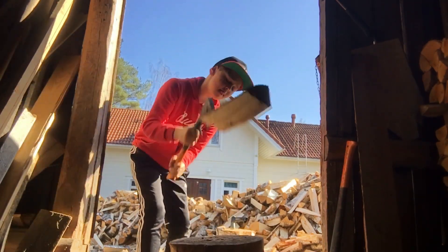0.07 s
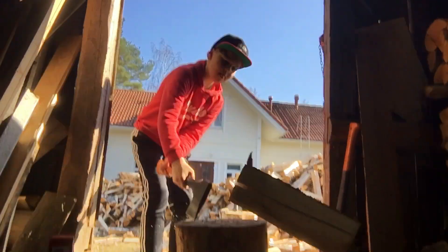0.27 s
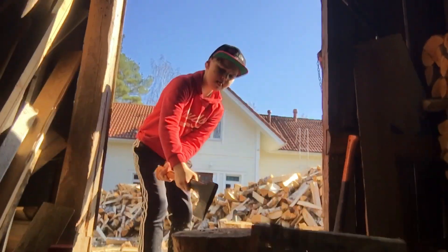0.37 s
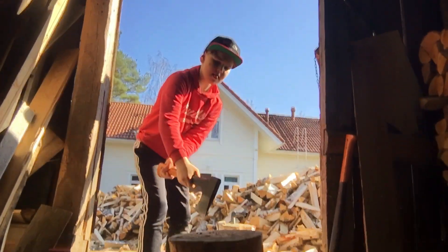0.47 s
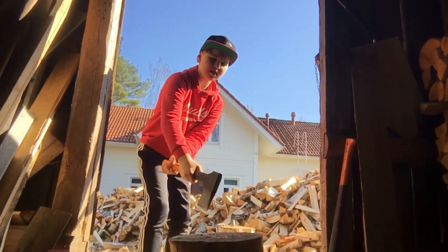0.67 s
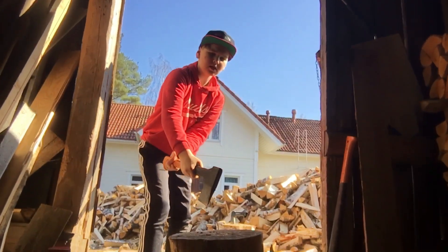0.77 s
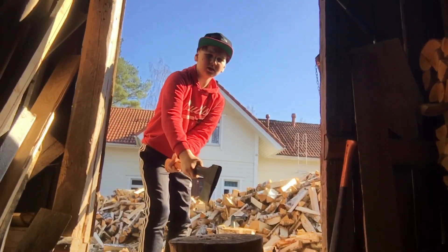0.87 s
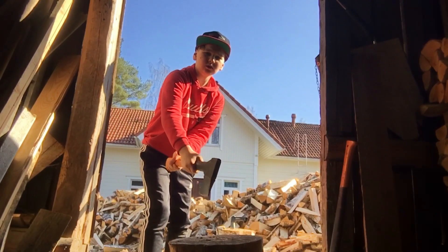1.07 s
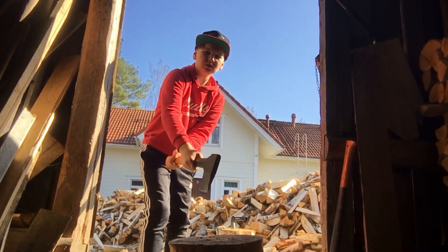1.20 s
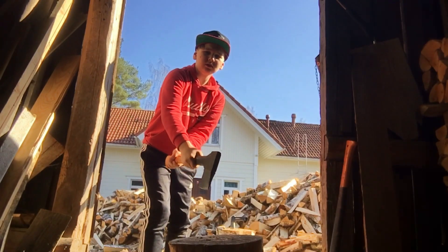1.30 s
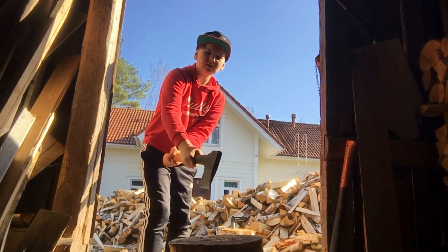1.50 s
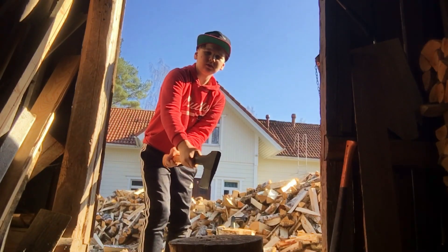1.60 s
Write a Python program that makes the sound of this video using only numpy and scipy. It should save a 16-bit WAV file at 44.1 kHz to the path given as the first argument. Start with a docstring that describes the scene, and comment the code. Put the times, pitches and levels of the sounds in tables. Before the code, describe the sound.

An axe splits a log, and one half clatters against boards onto a shed floor.

```python
"""A quiet yard in front of an open woodshed, one microphone close to the chopping block.
A foot shifts, an axe swishes, a log cracks open and the blade lands in the block. One half flies into
the shed, knocks against the boards, drops to the floor and rocks to rest; each knock is a dry clack
plus ringing wood modes. Splinters tick, a chip taps, the ground thuds and metal rings thinly.
The shed puts a short wooden reverberation behind the direct sound."""
import sys
import numpy as np
from scipy import signal
from scipy.fft import rfft, irfft, next_fast_len
from scipy.io import wavfile
from scipy.ndimage import uniform_filter1d

SR = 44100
rng = np.random.default_rng(int(sys.argv[2]) if len(sys.argv) > 2 else 0)


def transcribe(u):
    """Save the signal u as a 16-bit wav file named by the first command-line argument.

    u: samples, shape (n,) or (channels, n), limited to [-1, 1]; the rate is SR.
    q: integer samples, one column per channel.
    """
    v = np.clip(np.atleast_2d(u).T, -1, 1)
    q = np.round(v * 32767).astype(np.int16)
    wavfile.write(sys.argv[1], SR, q)


N = 72765
T = np.arange(N) / SR
HIT_T = T[:SR // 2]  # time within one hit

# Spectra and modes give relative levels; spectra are per Hz.
YARD_SPECTRUM = [(15, -28.5), (25, -4), (69, 0), (173, -10.5), (457, -14), (509, -16.5), (741, -16),
                 (1080, -19.5), (1950, -24), (5880, -32.5), (13200, -48), (15500, -52.5)]  # open air all round: f/Hz, level/dB
HISS_SPECTRUM = [(1000, 11), (3000, 1), (6000, -2.5), (9000, -13), (15500, -14)]  # faint hiss behind the clatter: f/Hz, level/dB
HISS_ENVELOPE = [(0.22, -80), (0.25, -58), (0.6, -54), (0.85, -58), (0.96, -60), (0.99, -67.5), (1.12, -67),
                 (1.2, -92)]  # its rise and fall: t/s, level/dB
SHED_SPECTRUM = [(60, -14.5), (200, -1.5), (400, 1), (1000, -1), (3000, 0), (7000, 1.5), (15000, -4)]  # colour of the reverberation: f/Hz, level/dB
SCUFF_SPECTRUM = [(80, -12), (230, 9.5), (320, -1), (500, -18), (2000, -54), (8000, -53)]  # foot on the ground: f/Hz, level/dB
LOW_THUDS = [(0.225, -12, 61), (0.238, -10.5, 105), (0.335, -14, 59.4), (0.47, -16.5, 171.9),
             (0.555, -33, 76), (0.815, -17.5, 62), (0.911, -18, 70), (1.006, -24, 66.7),
             (1.070, -27, 78), (1.139, -23.5, 80)]  # dull low thuds, mostly underfoot; the one near 0.24 s is the blade landing in the block: t/s, level/dB, f/Hz
METAL_RINGS = [(0.551, 6150, -22.5, 0.23), (0.552, 4930, -22.5, 0.24), (0.616, 4560, -24, 0.076),
               (0.621, 4780, -24, 0.1)]  # metal in the shed: t/s, f/Hz, level/dB, t60/s

CHIP_TAPS = [(0.9860, -28, 891), (1.0785, -36, 696), (1.1187, -29.5, 681)]  # last taps of a chip: t/s, level/dB, f/Hz
CHIP_MODES = [(.72, -0.5), (.92, 8.5), (1.2, -4), (1.449, 1), (1.75, -24)]  # its hollow ring: multiple of the tap's f, level/dB
SPLINTER_TICKS = [(0.141, -38, -4), (0.196, -34, -2), (0.206, -32, -22), (0.4342, -19, -16),
                  (0.694, -25, -7), (0.7110, -23, -1.5), (0.761, -21.5, -8), (0.8250, -20, -5.5),
                  (0.9825, -57, -0.5), (1.0225, -27.5, -2.5), (1.1030, -41.5, -24)]  # bark and splinters: t/s, level/dB, crispness/dB
TICK_SPECTRUM = [(300, -28), (1500, -9), (2300, 0), (3700, -2), (6500, -9), (9000, -17.5), (15500, -17.5)]  # colour of one tick: f/Hz, level/dB
ROCKING_ENVELOPE = [(0.60, -64), (0.63, -47), (0.70, -45), (0.745, -51), (0.765, -39.5), (0.80, -34.5),
                    (0.835, -43), (0.872, -37.5), (0.89, -50.5), (0.96, -69.5)]  # the half rocks to rest: t/s, level/dB
HUM_MODES = [(160, 49, -11.5), (285.5, 36, -2), (314.3, 24, -4.5), (366, 33, -1.5), (398.2, 40, -4.5),
             (460, 50, -4), (590, 50, -13.5), (674, 60, -12)]  # the floor humming under it: f/Hz, half-width/Hz, level/dB

# the flying half: t/s, level/dB, bass/dB, treble/dB, floor share (0 boards, 1 floor), pitch factor, t60/s
HALF_KNOCKS = [(0.3004, -7, -5, 25, 0.56, 1.1, 0.023), (0.3037, 15.5, -1.5, 13, 0.23, 1.022, 0.031),
               (0.3080, 13, 0, 6, 0.17, 0.99, 0.043), (0.3228, 10.5, -4, -6, 0, 1.03, 0.034),
               (0.3290, 1, 3, 6.5, 0.67, 1.07, 0.065), (0.352, -1, 2, -15.5, 0.55, 0.9, 0.048),
               (0.3775, -15, 0.5, -5, 0.2, 1.1, 0.023), (0.3942, -6, -4, -13, 0.48, 0.83, 0.13),
               (0.4107, 3.5, -5, -1, 0.22, 1.033, 0.043), (0.422, -6.5, 2, -12, 0.55, 1, 0.033),
               (0.4334, 4.5, 0, -6.5, 0.04, 1.22, 0.037), (0.4728, -3.5, 2.5, -10, .4, 1, .06),
               (0.5159, -3, -1, -2, .1, 0.9, .075), (0.5484, 18, -7.5, 1, 1, 1.044, 0.054),
               (0.553, 15, -4.5, 3.5, 0.83, 1, 0.053), (0.5605, 17, -1, -6.5, .95, 1, 0.056),
               (0.5891, 3, 1.5, 4, 0.2, 1.02, 0.058), (0.6102, 0, -5, -19, .8, 1.04, 0.086),
               (0.6704, -2, -4, -7.5, 0.49, 1.105, 0.065), (0.6861, -3, -2, -13, 0.41, .95, 0.065),
               (0.7000, -10.5, 6, -3, 0.65, 0.92, 0.054), (0.729, -8.5, -2.5, -31, 0.03, 1.08, 0.049),
               (0.758, 2, -1, -8, 1, 0.79, .062), (0.8030, -11, 3, -2, 0.92, 1.02, 0.07),
               (0.831, -7.5, -2, -17.5, 0, 1.02, 0.044), (0.854, -23, 6, -5, 0.43, 1.11, 0.063)]
BOARD_SPECTRUM = [(35, -70.5), (60, -35.5), (175, -1.5), (253, -5), (420, 4), (600, -4), (829, -4.5),
                  (910, -3), (1070, 1.5), (1170, -1), (1670, -8), (2150, -11.5), (2590, -15), (3420, -23.5),
                  (15500, -89.5)]  # clack against the boards: f/Hz, level/dB
BOARD_RING = [(180, -7.5), (276, -10), (377, -3.5), (440, -2), (815, -3.5), (985, 3.5), (1042, 5.5),
              (1320, 0.5), (1506, -2.5), (1798, -9), (2213, -12), (2790, -16.5)]  # modes of wood against the boards: f/Hz, level/dB
FLOOR_SPECTRUM = [(35, -61.5), (60, -24.5), (118, -10.5), (226, -12.5), (368, -3.5), (497, -3.5), (572, -2),
                  (1050, -12), (1150, -5), (1380, -12), (1910, -13), (2050, -14.5), (4220, -27),
                  (15500, -68)]  # clack on the floor: f/Hz, level/dB
FLOOR_RING = [(200, -15), (366, -0.5), (460, -9), (582, 7), (730, -5), (832, -1), (1043, -1.5), (1147, 3.5),
              (1770, -10), (1900, -15), (2843, -16)]  # modes of wood on the floor: f/Hz, level/dB

SWISH_SPECTRUM = [(120, -5), (250, -0.5), (500, -10.5), (1100, -8.5), (2200, -2.5), (3200, -10.5),
                  (6300, -17.5), (14000, -31)]  # air round the axe: f/Hz, level/dB
SWISH_ENVELOPE = [(0.09, -77.5), (0.15, -62.5), (0.185, -66.5), (0.202, -52), (0.214, -58.5),
                  (0.226, -48.5), (0.235, -82.5)]  # course of the swing: t/s, level/dB
LOG_CRACKS = [(0.2274, 5, 1.5, 4.5), (0.2303, 4.5, 2.5, 0.5), (0.2345, -5.5, -6.5, -4.5),
              (0.2390, 2, -5, -0.5)]  # the blade enters and the log parts: t/s, level/dB, bass/dB, treble/dB
CRACK_SPECTRUM = [(26, -34.5), (45, -9), (106, -20), (173, -4), (318, -9.5), (506, -6.5), (888, -11.5),
                  (1110, -9.5), (1480, -8.5), (1640, -9.5), (2670, -4.5), (2940, -8), (4240, -11),
                  (15500, -35.5)]  # splitting wood: f/Hz, level/dB
LOG_RING = [(110, -5), (210, 1), (315, 3), (760, -2), (900, -5), (1445, 0.5), (2081, -2), (2800, 0.5),
            (3155, -1), (4280, -7.5)]  # modes of the log under the blade: f/Hz, level/dB
BLOCK_RING = [(400, -7.5), (680, 0), (880, 0), (1130, -6.5), (1480, -3), (2200, -8)]  # modes of the chopping block: f/Hz, level/dB

BASS_HZ, MIDDLE_HZ, TREBLE_HZ, CRISP_HZ = 275, 850, 4000, 10075
DETUNE, DAMPING_HZ = 0.007, 4000  # relative scatter of the modes; f at which ring time is halved
CONTACT_S = 0.00066  # wood meets wood over this time
CONTACT_ONSET = 1 - np.exp(-HIT_T / CONTACT_S)


def undb(db):
    """Decibels to gain."""
    return 10 ** (np.asarray(db) / 20)


def unit(x):
    """Scale to unit energy."""
    return x / np.sqrt(np.sum(x ** 2) + 1e-18)


def fade(t60):
    """Exponential decay that loses 60 dB in t60 seconds."""
    return np.exp(-np.log(1000) * HIT_T / max(t60, 0.001))


def envelope(points, outside_db=-200):
    """Gain along (t/s, level/dB) points; outside_db=None holds the end levels."""
    return undb(np.interp(T, *np.array(points).T, left=outside_db, right=outside_db))


def add(out, start, x):
    """Mix a sound in at its start time."""
    i = int(start * SR)
    out[i:i + len(x)] += x[:N - i]


def colour(x, points):
    """Minimum-phase filter through (f/Hz, level/dB) points on a log-frequency axis."""
    n = 2 * next_fast_len(len(x) // 2 + SR // 20)
    hz, db = np.array(points).T
    bin_hz = np.maximum(np.fft.rfftfreq(n, 1 / SR), 1)
    gain = undb(np.interp(np.log(bin_hz), np.log(hz), db))
    cepstrum = irfft(np.log(gain))
    cepstrum[1:n // 2] *= 2  # folding onto positive time makes the filter causal
    cepstrum[n // 2 + 1:] = 0
    return irfft(rfft(x, n) * np.exp(rfft(cepstrum)))[:len(x)]


def noise(spectrum):
    """Coloured noise of rms 1."""
    return unit(colour(rng.standard_normal(N), spectrum)) * np.sqrt(N)


def burst(t60, treble_t60):
    """Countless crowded modes: a white burst of unit energy whose treble dies first."""
    n = len(HIT_T)
    hz, white = np.fft.rfftfreq(n, 1 / SR), rfft(rng.standard_normal(n))
    edges_hz = np.r_[0, np.geomspace(150, SR / 2, 15)]
    out = 0
    for lo, hi in zip(edges_hz[:-1], edges_hz[1:]):
        band = irfft(white * ((hz >= lo) & (hz < hi)), n)
        band_t60 = np.interp(np.log(hi), np.log([BASS_HZ, TREBLE_HZ]), [t60, treble_t60])
        out += np.sqrt(hi - lo) * unit(band * fade(band_t60))
    return unit(out)


def ring(modes, t60):
    """Damped modes, a little different in pitch and level at every blow; the high ones die sooner."""
    out = 0
    for k, (hz, db) in enumerate(modes):
        scatter_db, mistune = rng.standard_normal(2)
        tone = np.sin(2 * np.pi * hz * (1 + mistune * DETUNE) * HIT_T)
        decay = fade(t60 / (1 + hz / DAMPING_HZ))
        out += (-1) ** k * undb(db + scatter_db) * unit(decay * tone)
    return unit(out)


def contact(x, db, bass_db, treble_db):
    """Strength, weight and hardness of one contact."""
    return undb(db) * colour(unit(x), [(BASS_HZ, bass_db), (MIDDLE_HZ, 0), (TREBLE_HZ, treble_db)])


def yard(db=-68):
    """The bed: steady, low outdoor noise."""
    return undb(db) * noise(YARD_SPECTRUM)


def hiss():
    """A faint hiss comes up with the chop and sinks away after the clatter."""
    return noise(HISS_SPECTRUM) * envelope(HISS_ENVELOPE, outside_db=None)


def shed_reverb(direct, db=-9, build_s=0.0055):
    """Diffuse reflections from planks and stacked wood reach the microphone after the direct sound."""
    build_up = 1 - np.exp(-(HIT_T / build_s) ** 2)
    tail = unit(burst(t60=0.3, treble_t60=0.17) * build_up)
    return undb(db) * signal.fftconvolve(direct, colour(tail, SHED_SPECTRUM))[:N]


def foot_scuff(start=0.081, length_s=0.053, db=-66):
    """A foot shifts with the swing: a soft, low scuff before the blow."""
    progress = np.clip((T - start) / length_s, 0, 1)
    return undb(db) * noise(SCUFF_SPECTRUM) * np.sqrt(np.abs(np.sin(np.pi * progress)))


def low_thuds(attack_s=0.018):
    """Low thuds, each one low mode with a soft onset: most come through the ground, one is the blade landing in
    the block."""
    out, onset = np.zeros(N), 1 - np.exp(-HIT_T / attack_s)
    for start, db, hz in LOW_THUDS:
        add(out, start, undb(db) * unit(onset * ring([(hz, 0)], t60=0.11)))
    return out


def shaken_metal():
    """Back in the shed, the fall sets metal ringing in thin, pure tones."""
    out = np.zeros(N)
    for start, hz, db, t60 in METAL_RINGS:
        add(out, start, undb(db) * unit(fade(t60) * np.sin(2 * np.pi * hz * HIT_T)))
    return out


def chip():
    """A loose chip settles with light, hollow taps."""
    out = np.zeros(N)
    for start, db, hz in CHIP_TAPS:
        modes = [(hz * ratio, level) for ratio, level in CHIP_MODES]
        add(out, start, undb(db) * CONTACT_ONSET * ring(modes, t60=0.038))
    return out


def splinters():
    """Bark and splinters tick in tiny bright bursts, some crisper than others."""
    out = np.zeros(N)
    for start, db, crisp_db in SPLINTER_TICKS:
        tick = unit(colour(burst(t60=0.02, treble_t60=0.016), TICK_SPECTRUM))
        add(out, start, undb(db) * colour(tick, [(TREBLE_HZ, 0), (CRISP_HZ, crisp_db)]))
    return out


def rocking_half():
    """The half rocks on its rough bark, which keeps the low modes of the floor humming."""
    hz, bumps = np.fft.rfftfreq(N, 1 / SR), rfft(rng.standard_normal(N))
    hum = 0
    for mode_hz, width_hz, db in HUM_MODES:
        resonance = 1 / (1 + 2j * (hz - mode_hz) / width_hz) ** 2
        hum += undb(db) * unit(irfft(bumps * resonance, N))
    running_rms = np.sqrt(uniform_filter1d(hum ** 2, size=SR // 25) + 1e-18)
    return hum / running_rms * envelope(ROCKING_ENVELOPE)


def wood_knock(spectrum, modes, pitch, t60, ring_db, snap_db=-5.5):
    """Wood on wood: a hard snap and a dry clack in the colour of the surface, plus its ring."""
    spectrum = [(hz * pitch, db) for hz, db in spectrum]
    modes = [(hz * pitch, db) for hz, db in modes]
    clack = burst(t60, treble_t60=0.75 * t60)
    clack[0] += undb(snap_db)
    return unit(colour(clack, spectrum)) + undb(ring_db) * ring(modes, 1.3 * t60)


def tumbling_half():
    """Knocks on boards and floor; the end or edge that lands sets the pitch and how long it rings."""
    out = np.zeros(N)
    for start, db, bass_db, treble_db, floor_share, pitch, t60 in HALF_KNOCKS:
        boards = wood_knock(BOARD_SPECTRUM, BOARD_RING, pitch, t60, ring_db=-2.5)
        floor = wood_knock(FLOOR_SPECTRUM, FLOOR_RING, pitch, t60, ring_db=0)
        knock = CONTACT_ONSET * ((1 - floor_share) * boards + floor_share * floor)
        add(out, start, contact(knock, db, bass_db, treble_db))
    return out


def axe(ring_db=-0.5, landing_s=0.2475, landing_db=2.5):
    """Up front, the swing swishes, the log cracks open in quick steps and the blade hits the block."""
    out = noise(SWISH_SPECTRUM) * envelope(SWISH_ENVELOPE)
    for start, db, bass_db, treble_db in LOG_CRACKS:
        crack = unit(colour(burst(t60=0.046, treble_t60=0.018), CRACK_SPECTRUM))
        log_ring = undb(ring_db) * ring(LOG_RING, t60=0.035)
        add(out, start, contact(crack + log_ring, db, bass_db, treble_db))
    block = unit(CONTACT_ONSET * ring(BLOCK_RING, t60=0.083))
    add(out, landing_s, undb(landing_db) * block)
    return out


def scene():
    """At the microphone, in mono: chop and clatter with their reverberation, over the quieter sounds."""
    wood = axe() + tumbling_half() + splinters() + chip()
    behind = hiss() + shed_reverb(wood) + rocking_half() + low_thuds() + shaken_metal()
    return (wood + behind + foot_scuff() + yard())[None]


def record(dry, low_cut_hz=37, top_hz=16000):
    """The recorder drops the deepest bass, rounds the highest peaks and cuts the top."""
    low_cut = signal.butter(2, low_cut_hz, "high", fs=SR, output="sos")
    high_cut = signal.ellip(8, 0.2, 70, top_hz, fs=SR, output="sos")
    x = signal.sosfilt(low_cut, dry)
    rounded = x / (1 + x ** 12) ** (1 / 12)
    return signal.sosfilt(high_cut, rounded)


dry = scene()
out = record(dry)
transcribe(out)
```